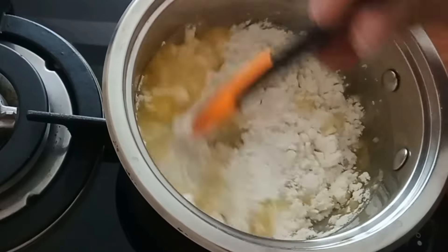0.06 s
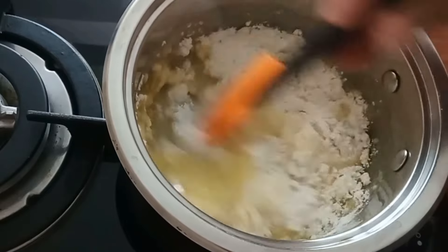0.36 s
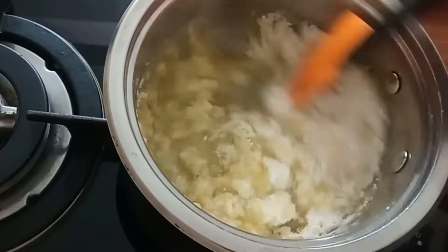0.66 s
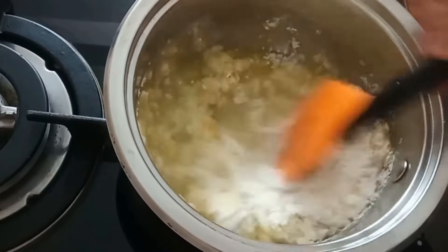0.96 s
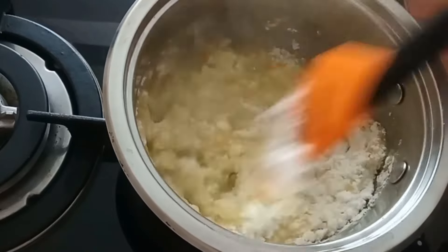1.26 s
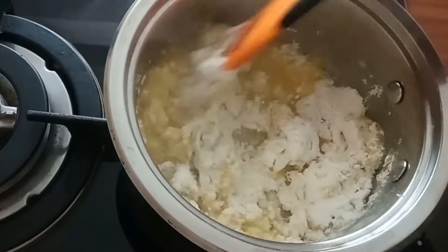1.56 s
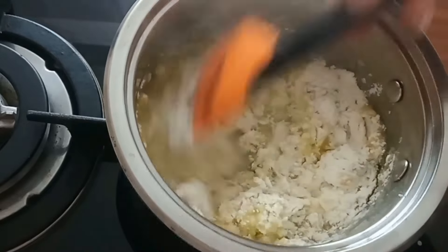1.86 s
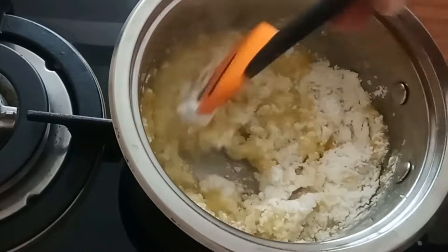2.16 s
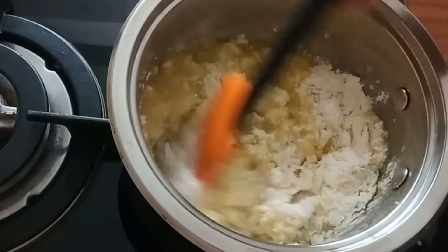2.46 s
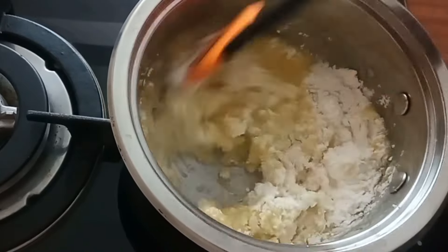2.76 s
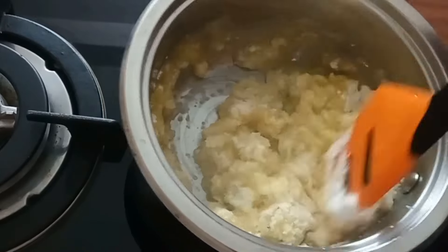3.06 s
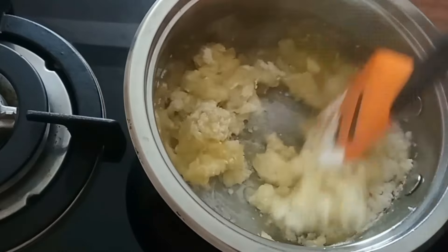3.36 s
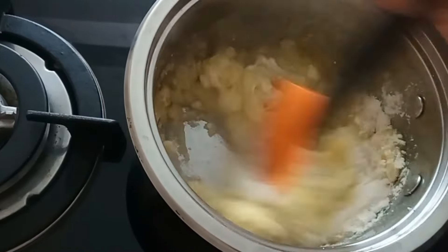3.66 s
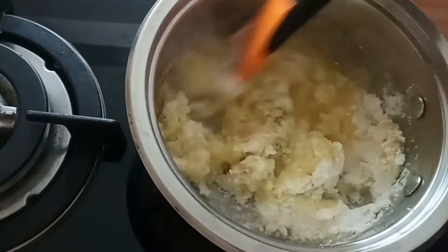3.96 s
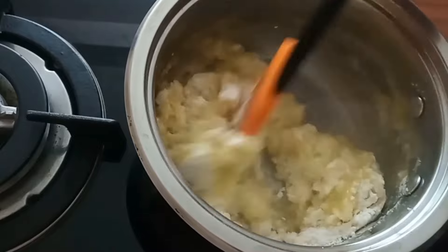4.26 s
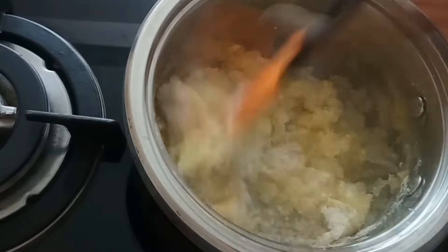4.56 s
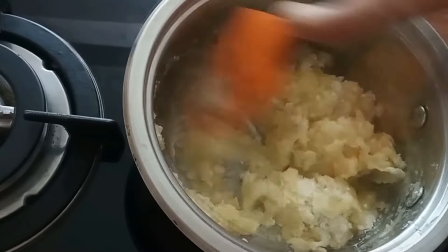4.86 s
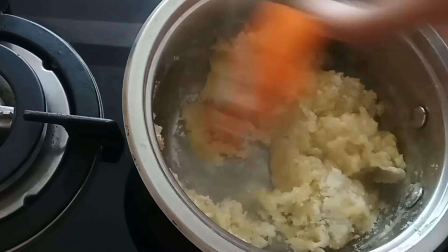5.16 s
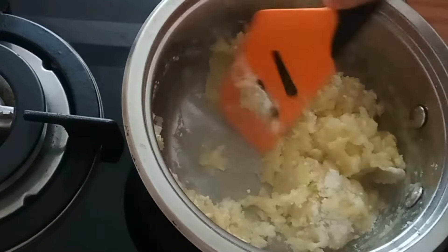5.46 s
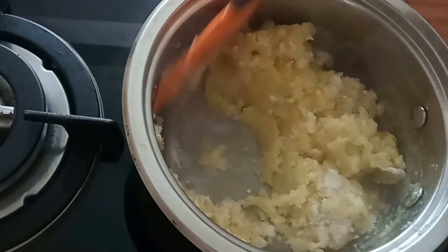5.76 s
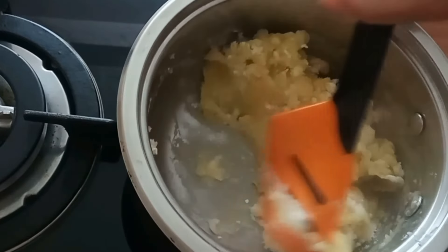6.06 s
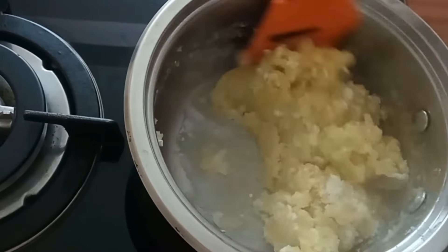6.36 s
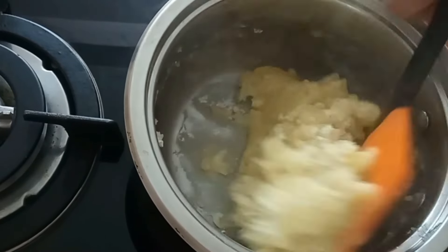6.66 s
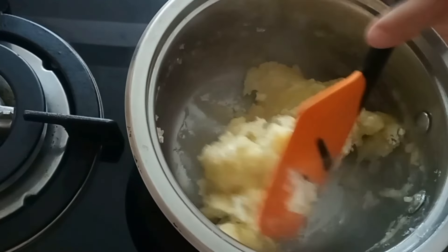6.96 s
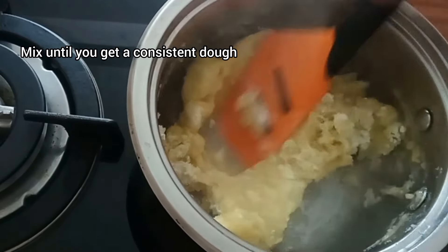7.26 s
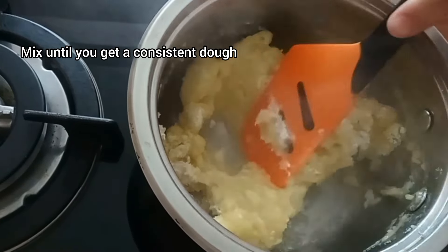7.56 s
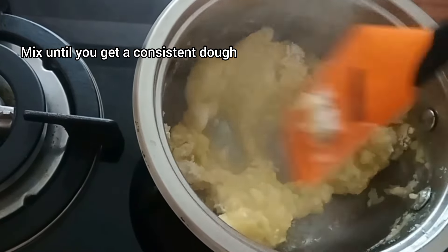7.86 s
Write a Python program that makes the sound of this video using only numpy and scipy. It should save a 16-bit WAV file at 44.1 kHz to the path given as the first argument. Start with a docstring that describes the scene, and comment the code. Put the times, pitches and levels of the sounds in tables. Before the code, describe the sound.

Dough being stirred in a steel pot, with uneven dull knocks, juddering scrapes, small sticky pops and softly frying butter.

```python
"""Stirring dough in a steel pot

A small kitchen, microphone close to the hob: a silicone spatula stirs flour into hot buttery dough.
Each stroke knocks the pot and judders over its base, now and then with a squeak: the loaded pot thrums
on its grate and its wall rings briefly. Butter sizzles, and the wet dough crackles and pops as it is
torn from the hot steel. The room answers faintly."""
import sys
import numpy as np
from scipy import signal
from scipy.fft import rfft, irfft, next_fast_len
from scipy.io import wavfile
from scipy.ndimage import uniform_filter1d, map_coordinates

SR = 44100
rng = np.random.default_rng(int(sys.argv[2]) if len(sys.argv) > 2 else 0)


def generate_wav(signal):
    """Clip the signal to [-1, 1] and save it as 16-bit WAV at the path in sys.argv[1]."""
    frames = np.transpose(np.atleast_2d(signal))
    scaled = np.clip(frames, -1, 1) * 32767
    pcm = np.round(scaled).astype(np.int16)
    wavfile.write(sys.argv[1], SR, pcm)


N = 349272
TIME, RING_TIME = np.arange(N) / SR, np.arange(SR // 4) / SR
TOP_HZ = 16200  # the recorder's band limit
# families of the pot's modes: low_hz, high_hz
ROCKING, WHOLE, BASE, WALL = (100, 280), (280, 480), (480, 2150), (2150, 7500)

# pushes of the spatula, levels relative within each layer:
# start_s, rise_s, length_s, ease_off_db, rocking_db, thrum_db, rasp_db, ring_db, tearing_db
STROKES = [(0.0, .008, .03, 4.5, -68, -60, -70.5, -93, -84.5),
           (0.257, 0.016, 0.023, 1, -71, -80, -82, -75, -70),
           (0.527, .004, 0.14, 9.5, -51, -40.5, -55, -61.5, -58),
           (0.636, 0.0073, 0.18, 12.5, -74, -71, -67, -80, -60),
           (0.811, .005, 0.21, 22, -38, -36.5, -39, -46, -52.5),
           (1.449, .008, 0.13, 4, -56, -39.5, -55.5, -72, -65),
           (1.556, .006, .2, 13, -41, -34.5, -42.5, -45.5, -59.5),
           (1.788, .004, 0.24, 12, -43, -37, -42.5, -53, -57),
           (2.036, .004, 0.24, 14.5, -50.5, -41, -49, -57, -68),
           (2.25, .015, 0.042, 1, -43.5, -40, -45.5, -46.5, -62.5),
           (2.299, .012, 0.036, 2, -40.5, -28, -42, -38, -55.5),
           (2.344, .022, 0.2, 22, -33.5, -33.5, -34.5, -43, -52.5),
           (2.496, .02, .12, 9, -65, -69, -71, -71.5, -52),
           (2.656, .012, .035, -5.5, -73.5, -51, -74, -87, -73),
           (2.875, .08, 0.094, 2.5, -81, -55, -61, -76, -71),
           (3.462, 0.0035, .045, 4, -92, -78, -73, -77, -66.5),
           (3.52, .004, 0.048, 3, -43, -36.5, -41, -59, -53.5),
           (3.572, 0.0091, 0.15, 17, -46, -35.5, -46, -60, -55.5),
           (3.762, 0.017, 0.19, 5.5, -48.5, -45, -50, -61, -53.5),
           (4.149, .004, 0.13, 8, -51.5, -41.5, -51, -69, -57),
           (4.436, 0.013, 0.14, 18, -57.5, -48, -56.5, -68, -62.5),
           (4.682, .004, 0.29, 7, -61.5, -49, -59.5, -74, -64),
           (4.793, .004, 0.083, 13, -40.5, -43.5, -39.5, -51, -61),
           (4.869, 0.026, 0.18, 18.5, -49.5, -43.5, -48.5, -58, -63.5),
           (5.633, 0.018, 0.098, 5.5, -49.5, -43, -48, -62, -60),
           (5.725, .004, 0.3, 8.5, -50.5, -43.5, -48.5, -64, -58),
           (5.848, .005, 0.19, 24, -67, -37, -49, -55, -62.5),
           (6.147, .055, .085, -4, -84, -57.5, -56.5, -71, -57),
           (6.454, .01, 0.037, 2, -62, -59, -57, -66, -58),
           (6.501, .005, 0.058, 12.5, -45, -38, -43.5, -65, -54),
           (7.114, .006, 0.024, 9.5, -49, -37, -65, -70, -61),
           (7.132, .015, 0.098, 4.5, -50, -46.5, -55, -68, -58),
           (7.666, .035, 0.059, -5.5, -74.5, -53, -55, -62, -60),
           (7.868, .02, 0.032, 2, -70.5, -56.5, -67.5, -66, -70)]
# spectrum of tearing dough: frequency_hz, gain_db
TEAR_SPECTRUM = [(300, -5), (1200, -6.5), (3000, -7), (4500, -1.5), (5600, -2.5), (6400, 3.5), (7200, 1),
                 (8000, -14.5), (9800, -10), (12000, -20.5), (13700, -17), (15000, -9.5), (16000, -23.5)]


def amp(db):
    """Decibels to gain."""
    return 10 ** (np.asarray(db) / 20)


def unit(x):
    """Scale to rms 1."""
    return x / np.sqrt(np.mean(x ** 2) + 1e-20)


def peak(x):
    """Scale to peak 1."""
    return x / np.abs(x).max()


def even(x, seconds):
    """Scale to a running rms of 1."""
    window = signal.windows.hann(int(seconds * SR) + 3)
    power = signal.fftconvolve(x ** 2, window / window.sum(), "same")
    return x / np.sqrt(np.abs(power) + 1e-12)


def fade(t, t60):
    """Exponential decay of 60 dB in t60 seconds."""
    return np.exp(-np.log(1000) * t / t60)


def along(points, hz):
    """Read (frequency_hz, value) points on a log frequency axis."""
    frequencies, values = np.transpose(points)
    return np.interp(np.log(hz + 1), np.log(frequencies), values)


def add(track, start_s, sound):
    """Mix a sound into a track."""
    part = track[max(round(start_s * SR), 0):][:len(sound)]
    part += sound[:len(part)]


def colour(x, spectrum):
    """Minimum-phase filter through (frequency_hz, gain_db) points."""
    size = 2 * next_fast_len(len(x) // 2 + 4096)
    gain = amp(along(spectrum, np.fft.rfftfreq(size, 1 / SR)))
    cepstrum = irfft(np.log(gain))
    cepstrum[1:size // 2] *= 2
    cepstrum[size // 2 + 1:] = 0
    return irfft(rfft(x, size) * np.exp(rfft(cepstrum)))[:len(x)]


def wobble(knots_per_s):
    """A smooth random curve."""
    knots = rng.standard_normal(int(N * knots_per_s / SR) + 4)
    return map_coordinates(knots, [TIME * knots_per_s])


def room_tone():
    """The faint, steady noise of the quiet kitchen."""
    # spectrum of the room: frequency_hz, gain_db
    spectrum = [(15, -37.5), (25, -23.5), (48, -8), (326, 7), (624, -7), (818, 2), (1130, -4.5),
                (3620, -10), (6380, -11.5), (8140, -20), (9840, -20.5), (13200, -24), (16000, -11.5)]
    return amp(-79) * unit(colour(rng.standard_normal(N), spectrum))


def kitchen(x):
    """The small room returns a diffuse tail, 5 ms late, whose treble dies first."""
    # reverberation times: frequency_hz, t60_s
    decay_times = [(150, 0.42), (800, 0.26), (3000, 0.24), (12000, 0.085)]
    hz, t, noise = signal.stft(rng.standard_normal(SR // 2), SR, nperseg=256)
    decay = fade(t, along(decay_times, hz)[:, None])
    tail = signal.istft(noise * decay, SR, nperseg=256)[1]
    tail = np.pad(tail, (SR // 200, 0))
    return signal.fftconvolve(x, tail / np.linalg.norm(tail))[:N]


def crackle(level_db, spectrum, snaps_per_s, spread_db, t60_s, swish_db):
    """Countless tiny wet films snap; as the level rises they merge into a smooth swish."""
    merge_db = -67  # around this level the single snaps begin to merge
    t = RING_TIME[:SR // 400]
    when, pitch, size, life = rng.random((int(snaps_per_s * N / SR), 4)).T
    hz = 500 + pitch * TOP_HZ
    strength = amp(spread_db * np.minimum(-np.log(1 - size), 4))
    decay = fade(t, t60_s * (.5 + life[:, None]))
    grains = strength[:, None] * np.sin(2 * np.pi * hz[:, None] * t) * decay
    place = (when * N).astype(int)[:, None] + np.arange(len(t))
    snaps = unit(np.bincount(place.ravel(), grains.ravel(), N)[:N])
    # every snap scatters between the pot's walls for a few milliseconds
    lingering_power = signal.fftconvolve(snaps ** 2, fade(RING_TIME, 0.011) ** 2)[:N]
    scattered = unit(np.sqrt(np.abs(lingering_power)) * rng.standard_normal(N))
    swish = amp(swish_db + 0.47 * (level_db - merge_db)) * rng.standard_normal(N)
    texture = colour(snaps + amp(-1) * scattered + swish, spectrum)
    return amp(level_db - 0.5) * even(texture, seconds=0.27)


def sizzle():
    """Butter fries on the hot steel all the time, in small random flares."""
    # the sizzle grows as the base is laid bare: time_s, level_db
    levels = [(0, -77.5), (.45, -79.5), (.75, -62), (1.15, -72), (1.25, -82.5), (1.65, -67.5),
              (2.15, -86.5), (2.7, -67.5), (2.9, -76), (3.45, -74.5), (4.05, -65.5), (4.65, -69),
              (5.1, -73.5), (5.55, -68.5), (6.1, -71), (6.4, -73.5), (6.75, -68.5), (7.92, -70)]
    # spectrum of frying butter: frequency_hz, gain_db
    spectrum = [(290, -38), (500, -7), (659, -14.5), (729, -8.5), (1050, -16.5), (1260, -11.5), (2230, -14),
                (4600, -11.5), (6610, -0.5), (8330, -15.5), (9770, -13), (12900, -28.5), (16000, -9)]
    flare_db = 1.5 * wobble(knots_per_s=33)
    level_db = np.interp(TIME, *np.transpose(levels)) + 2 + flare_db
    return crackle(level_db, spectrum, snaps_per_s=800, spread_db=6.2, t60_s=0.001, swish_db=-2)


def pressure(rise_s, length_s, ease_db):
    """The blade bites, eases off as the dough gives way, then lifts."""
    lift_t60_s = 0.098
    t = np.arange(int((length_s + lift_t60_s * 2) * SR)) / SR
    bite = np.sin(np.pi / 2 * np.minimum(t / rise_s, 1)) ** 2
    ease = amp(-ease_db * np.clip((t - rise_s) / length_s, 0, 1))
    lift = fade(np.maximum(t - length_s, 0), lift_t60_s)
    return bite * ease * lift


def tearing():
    """The wet dough crackles as each push tears it off the steel in clumps."""
    power = np.full(N, 1e-10)
    for start_s, rise_s, length_s, ease_db, *_, tearing_db in STROKES:
        add(power, start_s, (amp(tearing_db) * pressure(rise_s, length_s, ease_db)) ** 2)
    clump_db = 2 * wobble(knots_per_s=65)
    level_db = 10 * np.log10(power) + clump_db
    return crackle(level_db, TEAR_SPECTRUM, snaps_per_s=790, spread_db=6, t60_s=0.0008, swish_db=-3.5)


def smacks():
    """The sticky blade comes free: a thread of dough parts with a dry click of a few cycles."""
    # parting threads: start_s, peak_db, pitch_hz
    threads = [(1.306, -43, 4940), (1.3405, -46, 4000), (6.3237, -36, 4800), (6.3645, -37, 3950),
               (6.3735, -37, 3850)]
    out, t = np.zeros(N), RING_TIME[:SR // 100]
    for start_s, db, hz in threads:
        click = np.sin(2 * np.pi * hz * t) * t * fade(t, t60=.003)
        add(out, start_s, amp(db) * peak(click))
    return out


def pot_ring(family, scatter_db, flip_share=0):
    """One family of the pot's modes rings; the place of the tap sets their strengths and signs."""
    # modes of the pot, damped by the dough: pitch_hz, level_db, t60_s
    modes = [(130, -17, .08), (198, -5, .1), (258, -9, .07), (322, -4, .13), (395, -11, .06),
             (465, -16, .05), (520, -8, .05), (569, -6, .1), (690, -1, .09), (780, -2, .06), (844, -1, .1),
             (914, -2, .1), (1070, -1, .06), (1185, -1, .07), (1255, 0, .08), (1350, -4, .05),
             (1691, -4, .12), (1810, -4, .05), (2030, -8, .04), (2913, -14, .14), (3171, -10, .08),
             (3270, -10, .06), (4269, -19, .12), (4700, -14, .04), (6153, -10, .025), (6542, -14, .14),
             (6870, -14, .03), (216, 0, .15), (341, 0, .19), (2305, -7, .14), (2468, -3, .12),
             (2567, -5, .15), (2709, 0, .2)]
    low_hz, high_hz = family
    gains = amp(scatter_db * rng.standard_normal(len(modes)))
    gains *= np.where(rng.random(len(modes)) < flip_share, -1, 1)
    ring = sum(gain * amp(db) * fade(RING_TIME, t60) * np.sin(2 * np.pi * hz * RING_TIME)
               for (hz, db, t60), gain in zip(modes, gains) if low_hz < hz <= high_hz)
    band = signal.butter(2, [low_hz * .7, high_hz * 1.2], "band", fs=SR, output="sos")
    return signal.sosfilt(band, ring)


def small_pockets(per_s):
    """Lesser air pockets burst at random: start_s, level_db, pitch_hz, snap_db."""
    count = int(per_s * N / SR)
    starts, chance = rng.uniform(0, N / SR, count), rng.standard_normal((count, 2))
    return [(start_s, -56.5 - 0.5 * weakness, 6500 * np.exp(0.12 * tune), -84)
            for start_s, (weakness, tune) in zip(starts, chance)]


def pops():
    """An air pocket bursts in the dough, chirps upward as it opens and taps the pot's base."""
    # the largest pockets: start_s, level_db, pitch_hz, snap_db
    large_pockets = [(0.4329, -37.5, 6480, -50), (0.4823, -49.5, 6930, -80.5), (1.0909, -37, 6680, -73),
                     (1.1233, -41.5, 6490, -77), (1.3952, -38, 6590, -87.5), (1.9909, -31.5, 6460, -66.5),
                     (2.4279, -45, 6240, -75), (2.6284, -37, 4340, -57.5), (2.8235, -42.5, 6100, -73),
                     (2.8404, -43, 6350, -74.5), (3.0225, -33, 5860, -90), (3.0874, -41.5, 6710, -97),
                     (3.1688, -42, 6920, -64), (3.3906, -41.5, 5840, -89), (3.475, -40, 6720, -57),
                     (3.6057, -34, 7110, -57), (3.8147, -37, 6170, -62), (4.1046, -43, 6520, -70),
                     (4.3615, -42.5, 6500, -72), (4.4104, -37.5, 6220, -74), (5.2435, -42, 6180, -64),
                     (5.468, -41.5, 6190, -66), (6.7625, -44, 6520, -65), (7.009, -43, 5900, -75),
                     (7.1147, -37, 7280, -64), (7.1911, -32, 6520, -45), (7.3616, -45, 6910, -90),
                     (7.5193, -38, 5570, -69.5), (7.5812, -60, 6520, -58.5), (7.6326, -41.5, 7150, -89),
                     (7.644, -54, 6350, -91), (7.7498, -33.5, 6940, -47)]
    snap_spectrum = [(8000, -22.5), (13000, -2.5), (15500, -4)]  # frequency_hz, gain_db
    glide_share, glide_s = 0.36, 0.0013
    out, t = np.zeros(N), RING_TIME[:SR // 50]
    opening = 1 - np.exp(-(t / .0006) ** 2)
    burst = opening * (fade(t, 0.0033) + amp(-22.5) * fade(t, 0.026))
    for start_s, db, hz, snap_db in [*large_pockets, *small_pockets(per_s=4)]:
        pitch_hz = hz * (1 + glide_share * (.5 - np.exp(-t / glide_s)))
        cavity = peak(np.sin(2 * np.pi * np.cumsum(pitch_hz) / SR) * fade(t, 0.0026) * opening)
        tear = peak(colour(rng.standard_normal(len(t)) * burst, TEAR_SPECTRUM))
        snap = peak(colour(rng.standard_normal(len(t)) * fade(t, 0.0051), snap_spectrum))
        pop = amp(db) * (amp(-4.5) * cavity + amp(-9) * tear) + amp(snap_db + 10) * snap
        base_tap = peak(pot_ring(BASE, scatter_db=4, flip_share=.5) * fade(RING_TIME, .03))
        add(out, start_s, pop)
        add(out, start_s, amp(db - 28) * base_tap)
        add(out, start_s + rng.uniform(.0009, .0018), amp(-9) * pop)  # thrown back by the pot's wall
        for delay_s in 0.011 * rng.random(size=2):  # it sets off two neighbours
            add(out, start_s + delay_s, amp(-11.5) * pop)
    return out


def squeaks():
    """The silicone grips bare steel: unsteady squeaks and groans that swell quickly and let go."""
    # friction tones: start_s, length_s, pitch_hz, width_hz, level_db
    grips = [(0.802, .034, 4710, 100, -58), (1.557, 0.074, 3070, 250, -58), (1.833, 0.16, 687, 69, -52),
             (2.036, 0.087, 642, 84, -51.5), (2.243, 0.06, 3170, 310, -58), (2.273, 0.15, 7450, 30, -63.5),
             (2.3, 0.062, 6560, 180, -53.5), (2.311, .035, 2760, 70, -52), (2.337, 0.042, 342.8, 11, -29),
             (2.346, 0.11, 4720, 500, -58.5), (2.357, .11, 6240, 650, -57), (2.932, 0.083, 730, 47, -55),
             (5.753, .11, 4900, 64, -66.5), (5.997, .024, 849, 20, -41.5), (6.14, .1, 4750, 700, -66),
             (6.176, 0.08, 752, 160, -58), (6.445, 0.034, 5020, 70, -61), (7.113, 0.038, 4920, 71, -64.5),
             (7.114, 0.025, 5720, 70, -61), (7.169, .1, 689, 90, -61), (7.676, 0.1, 724, 194, -56),
             (7.68, 0.07, 3520, 140, -66)]
    out, t = np.zeros(N), RING_TIME
    for start_s, length_s, hz, width_hz, db in grips:
        progress = t / length_s
        swell = peak(progress ** 1.7 * np.exp(-5 * progress))
        # a wandering phase widens the tone
        waver = np.cumsum(rng.standard_normal(len(t))) * np.sqrt(np.pi * width_hz / SR)
        tone = np.sin(2 * np.pi * hz * t + uniform_filter1d(waver, size=64))
        add(out, start_s, amp(db + 5) * swell * tone)
    return out


def knocks():
    """A blow gives a dull tock of the blade, a thump of the pot on its grate and a ring of the wall."""
    # blows of the spatula: start_s, contact_db, blade_hz, blade_t60_s, thump_db, ring_db, edge_db
    blows = [(.529, -41, 1030, 0.019, -40.5, -66, -49), (.61, -47, 980, 0.055, -37, -69, -55),
             (.682, -64, 690, .03, -42.5, -68, -65), (0.809, -30, 900, 0.0078, -28.5, -34, -39),
             (.824, -38, 1014, 0.08, -29.5, -32.5, -56.5), (1.453, -37.5, 675, 0.043, -47, -57, -67),
             (1.567, -35, 1360, 0.05, -36.5, -32.5, -54), (1.779, -20.5, 1380, 0.013, -28.5, -30.5, -28.5),
             (1.85, -29, 620, 0.049, -28.5, -38.5, -55), (1.962, -34, 860, 0.013, -33, -56, -61),
             (2.024, -27, 670, .03, -27, -40, -34.5), (2.131, -39.5, 1035, .045, -35, -57, -67),
             (2.188, -40.5, 1022, 0.12, -38, -47.5, -65), (2.367, -28.5, 1184, 0.036, -23, -34.5, -37.5),
             (2.376, -27.5, 1000, .04, -34, -42.5, -46.5), (2.409, -34, 1270, .03, -34, -58, -54),
             (2.965, -41.5, 770, 0.024, -51, -62, -58), (3.523, -27, 820, 0.037, -39, -36, -35),
             (3.571, -25.5, 797, 0.05, -22.5, -45, -45), (3.761, -40.5, 855, 0.052, -40, -65, -58),
             (3.777, -23.5, 865, 0.022, -30, -42.5, -47), (3.859, -32, 678, 0.11, -30, -49, -57),
             (4.149, -28.5, 860, 0.038, -37, -49, -48), (4.451, -40, 800, 0.075, -35.5, -56, -70),
             (4.534, -54.5, 810, 0.044, -39.5, -77, -70), (4.697, -33.5, 1240, 0.022, -42, -47, -53),
             (4.801, -23.5, 1143, 0.034, -30.5, -38, -35), (4.896, -30.5, 760, 0.0071, -41, -44.5, -46),
             (5.641, -27, 880, 0.027, -42.5, -72, -64), (5.654, -27.5, 920, .075, -37.5, -46, -60),
             (5.722, -23.5, 835, .045, -33, -53, -51), (5.86, -39, 700, 0.032, -36.5, -57, -41),
             (6.446, -23, 855, 0.073, -60, -42, -26.5), (6.496, -33, 820, 0.066, -48, -65, -49.5)]
    # spectrum of the dull contact: frequency_hz, gain_db
    contact_spectrum = [(60, -46), (200, -20), (450, -7), (800, 9), (1300, 3), (2400, 0.5), (3600, -35.5),
                        (8000, -42.5), (16000, -62.5)]
    # spectrum of the blow's hard edge: frequency_hz, gain_db
    edge_spectrum = [(1000, -15), (3000, -0.5), (4700, -1.5), (5400, -7.5), (6200, 9), (7300, -8),
                     (8000, -31.5), (10000, -26.5), (16000, -38)]
    out, t = np.zeros(N), RING_TIME
    # the heavy pot is slow to start, and the pressed blade damps it
    swell = (1 - np.exp(-t / 0.0031)) * fade(t, 0.54)

    def tap(family):
        return peak(pot_ring(family, scatter_db=1.5))

    for start_s, contact_db, hz, t60, thump_db, ring_db, edge_db in blows:
        flex = np.sin(2 * np.pi * hz * t) + amp(-11.5) * np.sin(2 * np.pi * 1.22 * hz * t)
        tock = peak(flex * fade(t, t60) * (1 - np.exp(-t / .0003)))
        chatter = amp(-4) * rng.standard_normal(len(t)) * fade(t, 0.017)
        contact = peak(colour((t == 0) + chatter, contact_spectrum))  # one clean push, then chatter
        edge = peak(colour(rng.standard_normal(len(t)) * fade(t, .016), edge_spectrum))
        blade = amp(contact_db) * (amp(-5.5) * tock + amp(-6) * contact + amp(-36) * tap(BASE))
        rocking = amp(thump_db - 11.5) * peak(swell * tap(ROCKING))
        thump = amp(thump_db) * peak(swell * tap(WHOLE))
        ring = amp(ring_db - 2) * tap(WALL)
        add(out, start_s, blade + amp(edge_db - 4.5) * edge + rocking + thump + ring)
    return out


def slips(per_s, spread_db):
    """Irregular little jerks of a sticking, slipping blade."""
    slipping = rng.random(N) < per_s / SR
    return slipping * rng.choice([-1, 1], N) * amp(spread_db * rng.standard_normal(N))


def stroke_gains():
    """Rocking, thrum, rasp and ring gains of all strokes, silent while the blade is lifted."""
    powers = np.zeros((4, N))
    for start_s, rise_s, length_s, ease_db, *levels_db, _ in STROKES:
        push = pressure(rise_s, length_s, ease_db)
        for power, db in zip(powers, levels_db):
            add(power, start_s, (amp(db) * push) ** 2)
    judder_db = 2.5 * wobble(knots_per_s=45)  # the hand never presses evenly
    return np.sqrt(powers) * amp(judder_db)


def scraping():
    """The blade judders over the steel and every slip shakes the pot's modes."""
    rocking, thrum, rasp, ring = stroke_gains()
    jerks = slips(per_s=900, spread_db=4) + 0.015 * rng.standard_normal(N)
    turn = 2 * np.pi * 1.6 * TIME  # the blade circles the pot and meets the modes at changing places

    def shaken(family):
        rings = [pot_ring(family, scatter_db=1, flip_share=.5) for _ in range(2)]
        here, there = (unit(signal.fftconvolve(jerks, response)[:N]) for response in rings)
        return here * np.cos(turn) + there * np.sin(turn)

    # spectrum of silicone rubbing on steel: frequency_hz, gain_db
    rub_spectrum = [(60, -37.5), (150, -10.5), (300, -5.5), (520, -3), (800, 3.5), (1250, -13), (1500, -8),
                    (2600, -11.5), (3500, -26), (8000, -53), (16000, -63)]
    rubbing = unit(shaken(BASE)) + amp(0.5) * unit(colour(jerks, rub_spectrum))
    return (amp(-1) * rocking * even(shaken(ROCKING), seconds=0.07)
            + amp(-2) * thrum * even(shaken(WHOLE), seconds=0.035)
            + amp(-1.5) * rasp * even(rubbing, seconds=0.036)
            + amp(-4.5) * ring * even(shaken(WALL), seconds=0.013))


def scene():
    """Spatula, pot and dough close up, in mono, with the quiet kitchen well behind."""
    pot = scraping() + knocks() + squeaks()
    dough = pops() + smacks() + sizzle() + tearing()
    direct = pot + dough
    return (direct + room_tone() + amp(-17.5) * kitchen(direct))[None]


def record(dry):
    """The small microphone loses the deep bass and the recorder keeps nothing above its band limit."""
    low_cut_hz = 79
    thin = signal.sosfilt(signal.butter(2, low_cut_hz, "high", fs=SR, output="sos"), dry)
    size = next_fast_len(N + SR // 2)
    in_band = np.fft.rfftfreq(size, 1 / SR) < TOP_HZ
    return irfft(rfft(thin, size) * in_band, size)[:, :N]


dry = scene()
out = record(dry)
generate_wav(out)
```